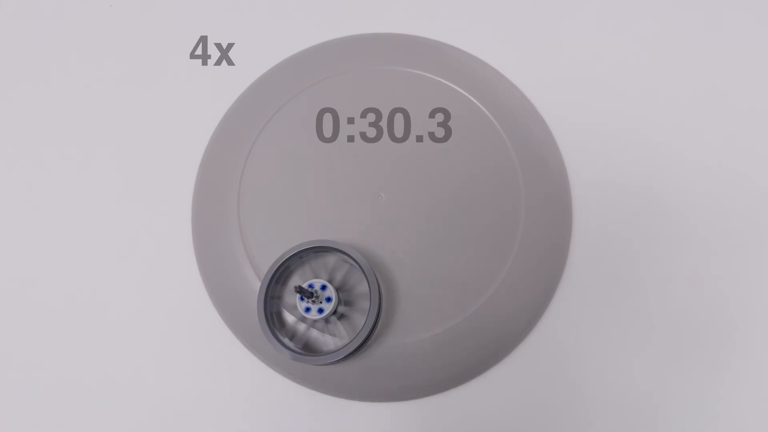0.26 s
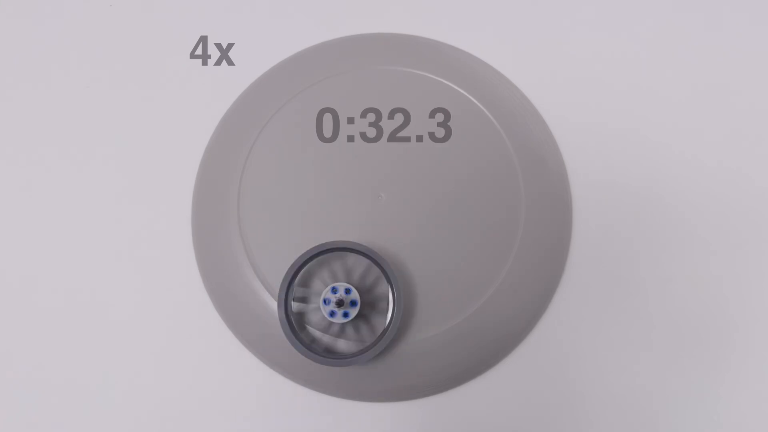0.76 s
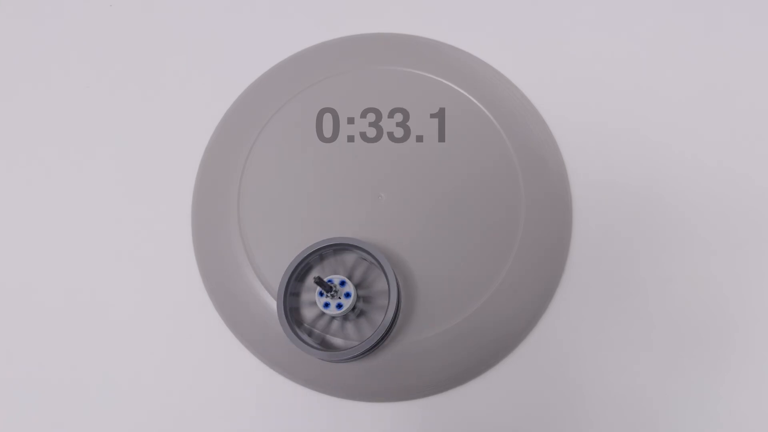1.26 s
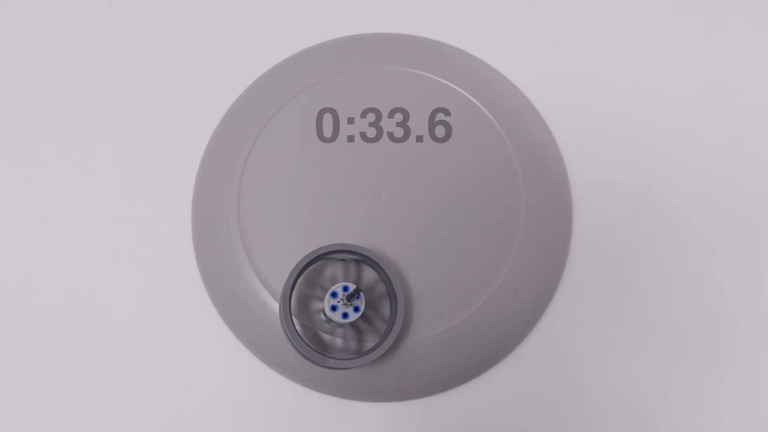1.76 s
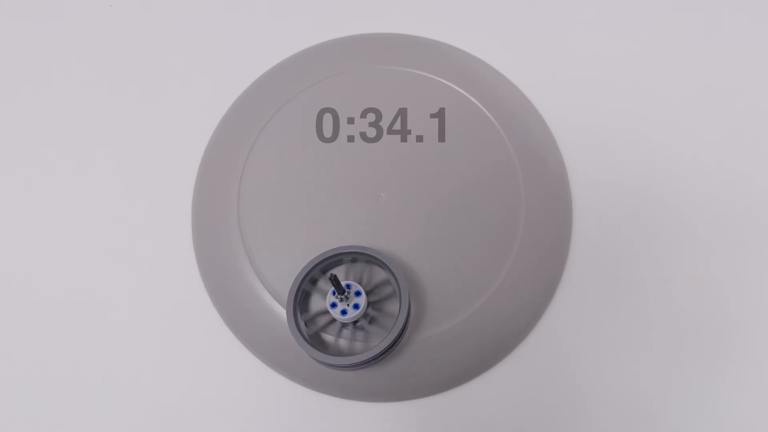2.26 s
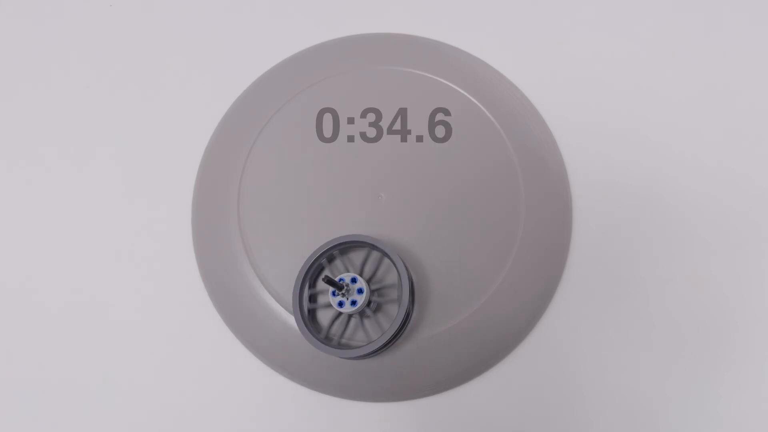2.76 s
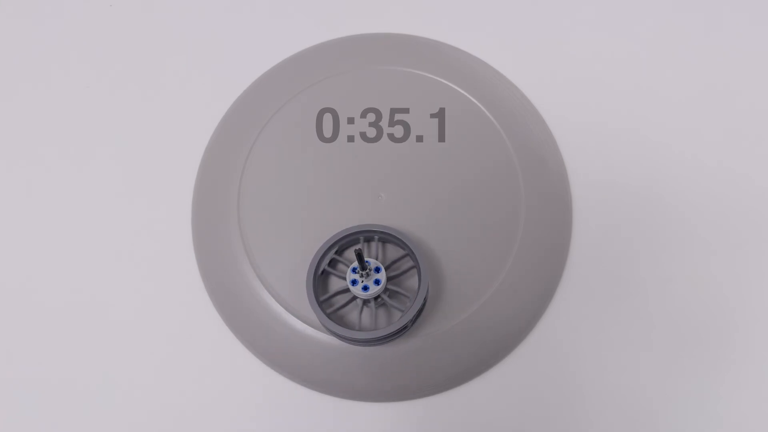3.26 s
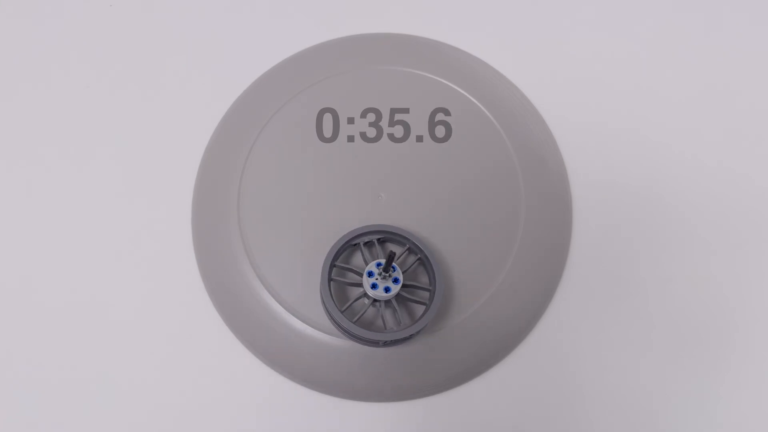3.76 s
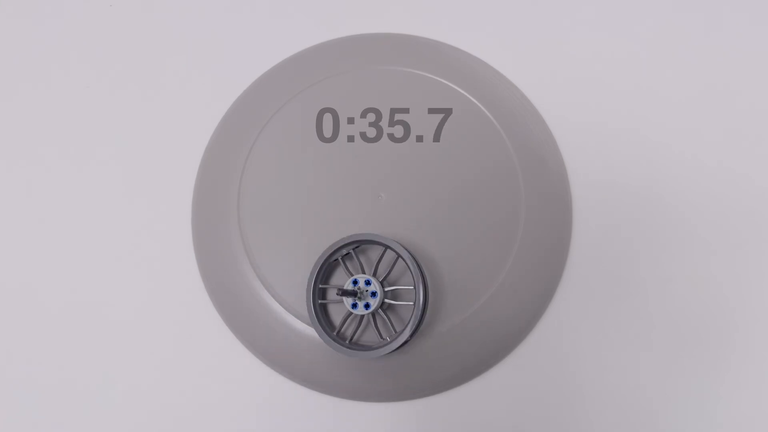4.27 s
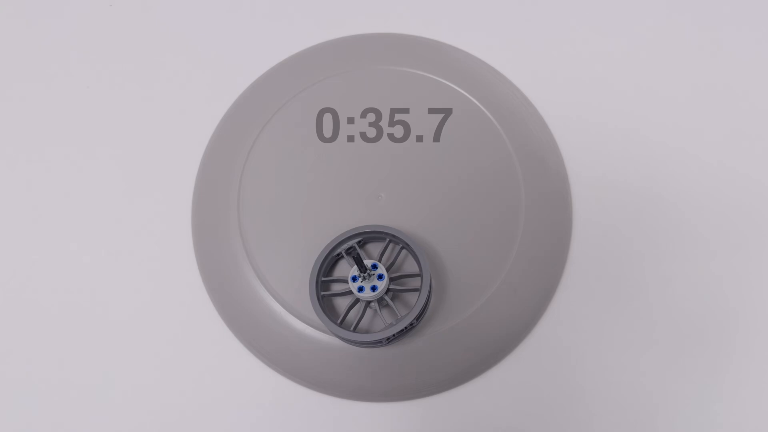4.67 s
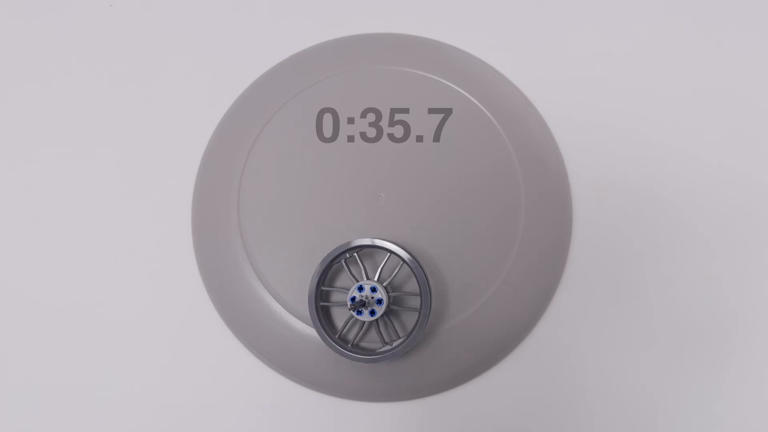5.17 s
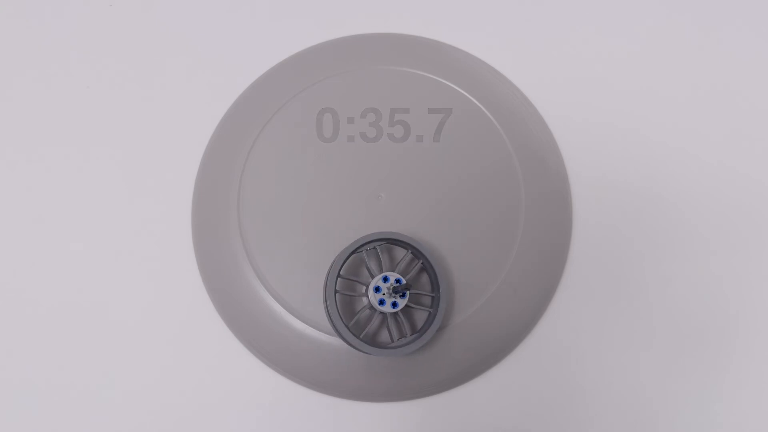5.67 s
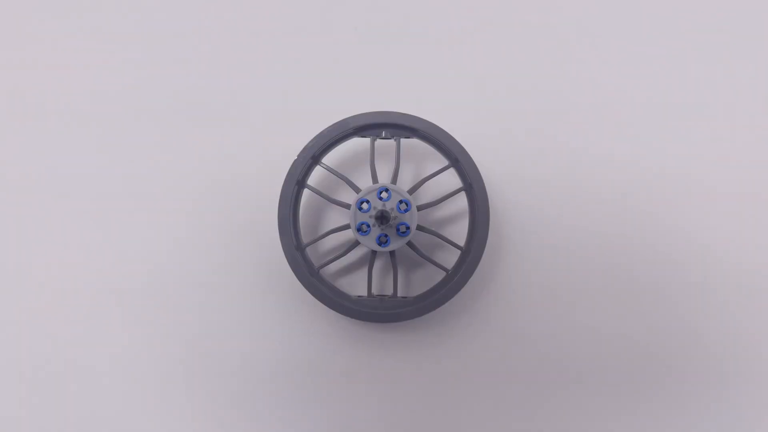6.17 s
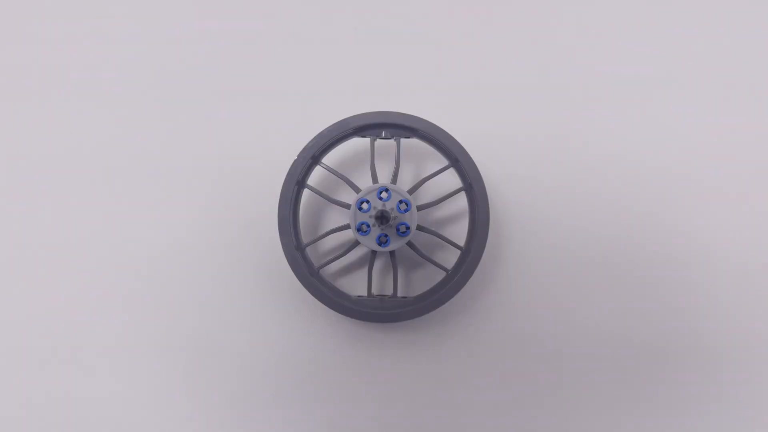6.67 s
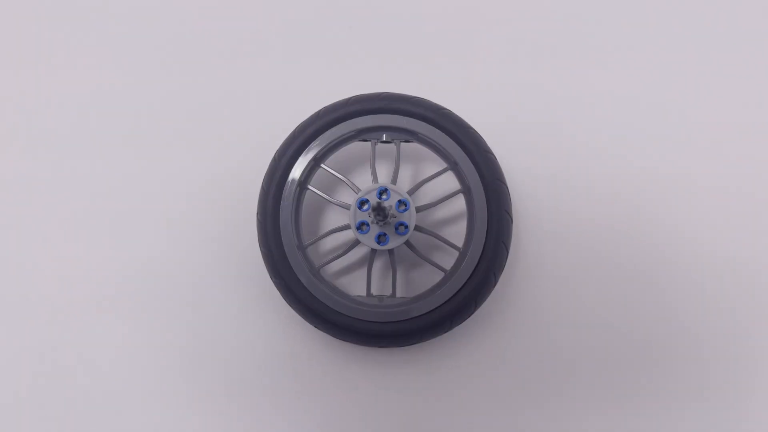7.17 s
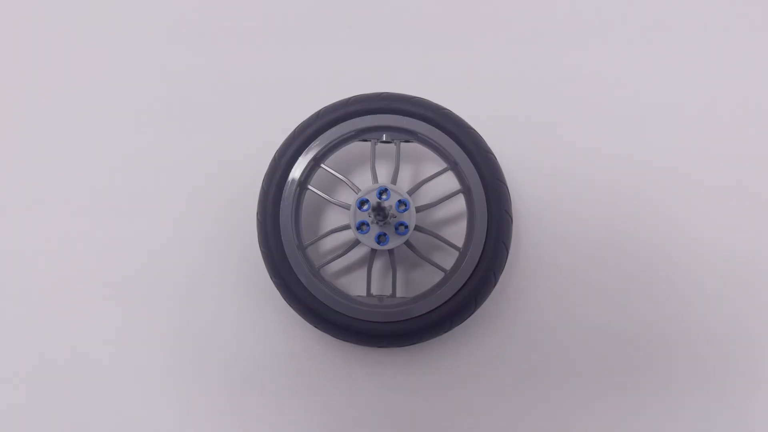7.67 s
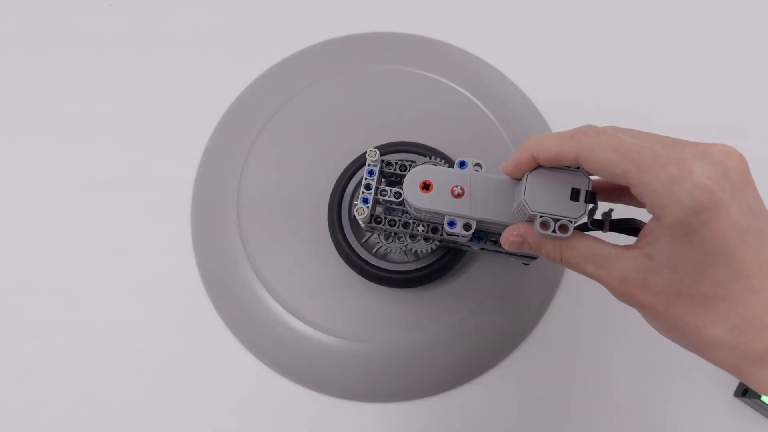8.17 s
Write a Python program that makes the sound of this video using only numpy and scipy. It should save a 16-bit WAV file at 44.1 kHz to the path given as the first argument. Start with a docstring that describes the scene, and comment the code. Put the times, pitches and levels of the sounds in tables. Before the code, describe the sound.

Over a low hum, a spinning plastic wheel tips, rattles and rocks to rest in a dish, followed by one finger-like snap.

```python
"""A low, uneven hum: a plastic wheel spun as a top turns on its tip in an upturned plastic dish.
It tilts; its rim strikes, skips and scrapes round the dish for two seconds, ringing dish and wheel.
It rolls to and fro with a few hollow knocks and rests. A sharp snap, as of fingers, follows in the
quiet room: a crack plus the ring of a small air pocket."""
import sys
import numpy as np
from scipy import signal
from scipy.fft import rfft, irfft, next_fast_len
from scipy.io import wavfile
from scipy.ndimage import uniform_filter1d, minimum_filter1d, map_coordinates

SR = 44100
rng = np.random.default_rng(int(sys.argv[2]) if len(sys.argv) > 2 else 0)


def dump(signal):
    """Clip the signal to [-1, 1] and save it as 16-bit WAV at the path in sys.argv[1]."""
    limited = np.clip(np.atleast_2d(signal).T, -1, 1)
    pcm = np.round(limited * 32767).astype(np.int16)
    wavfile.write(sys.argv[1], SR, pcm)


N = 371763

# dish modes: f/Hz, width/Hz, level/dB
DISH_MODES = [(151, 23, -8.5), (171, 17, -8.5), (208, 45, -8), (275, 33.5, -6), (349, 66, -8),
              (432.6, 25.6, -4.5), (521.6, 30, 3), (595, 44, -4.5), (727, 68, -8.5), (955.5, 24, -5.5),
              (1051, 70, -4.5), (1141, 30, -1.5), (1152, 22, 0), (1306, 158, -9), (1519, 113, -9.5),
              (2002, 370, -15.5), (2250, 294, -14), (2757, 330, -17.5), (2944, 230, -17.5),
              (3463, 100, -24), (4062, 380, -22.5), (4884, 390, -29.5)]
# wheel modes: f/Hz, width/Hz, level/dB, swing phase/spoke gaps, swing/dB
WHEEL_MODES = [(5600, 450, -13.5, 0.24, 1.5), (6506, 95, -0.5, 0.03, 8.5), (6980, 160, -3.5, 0, 3.5),
               (7690, 170, -5, 0.5, 3), (8240, 180, -4, 0.4, 0.5), (9090, 180, -7.5, 0.97, 2),
               (9720, 240, -10, 0.43, 7), (11400, 350, -18.5, 0, 0), (12650, 500, -23.5, .6, -1),
               (14100, 470, -15, .55, 2.5)]
# rim slides: start/s, end/s, pressure/dB
RIM_SLIDES = [(1.476, 1.525, 3.5), (1.615, 1.646, -1.5), (1.674, 1.688, 0), (1.702, 3.82, 0.5)]
# contact speed round the rim: t/s, speed/(spokes/s)
RIM_SPEED = [(1.45, 6.25), (2.15, 6.2), (2.5, 5.1), (2.95, 4.9), (3.25, 3.15), (3.55, 2.0), (3.82, 0.35)]
# rim strikes dish: t/s, level/dB, hardness/Hz, bounce delay/s
RIM_KNOCKS = [(.860, -26.5, 1420, 0.0015), (.865, -23, 690, 0.0023), (1.4589, -2, 1210, 0.014),
              (1.470, -5.5, 1200, .021), (1.503, -21, 3000, 0.0065), (1.511, -33, 2800, 0.0016),
              (1.535, -23.5, 4050, 0.0025), (1.539, -16, 4000, 0.0026), (1.551, -11, 2130, .003),
              (1.596, -13.5, 2366, .001), (1.609, -19.5, 2000, .006), (1.639, -12, 2500, 0.0025),
              (1.645, -12, 2500, 0.0017), (1.672, -9, 1970, .007), (1.693, -10.5, 1500, .005),
              (1.698, -10, 2300, .007), (1.875, -21.5, 4200, .004), (1.900, -21.5, 2620, 0.0016),
              (2.023, -13, 3500, 0.0028), (2.6281, -11, 2190, 0.015), (2.656, -10.5, 1030, 0.0019),
              (2.666, -10, 1100, 0.0065), (3.403, -19, 1900, .004), (3.885, -25.5, 990, 0.018),
              (3.9647, -3.5, 840, .0079), (4.058, -21, 695, 0.0027), (4.097, -21.5, 644, 0.0032),
              (4.304, -7, 790, .0055), (4.416, -41.5, 4000, 0.0025), (4.904, -31.5, 750, 0.0035),
              (4.942, -45.5, 4500, 0.0022), (5.056, -8, 646, .002), (5.267, -26, 600, 0.0025),
              (5.404, -25.5, 560, 0.0027), (5.6549, -9, 694, .0057)]
# rolls on the rim: peak t/s, level/dB, rise/s, fall/s
ROLL_SWELLS = [(3.72, -44.5, .12, .15), (3.95, -32, 0.24, 0.098), (4.14, -24.5, 0.09, 0.04),
               (4.45, -37.5, 0.14, .05), (5.0, -36, 0.14, 0.11), (5.32, -27.5, 0.11, 0.094),
               (5.72, -46, 0.045, 0.066), (5.82, -37.5, 0.056, 0.067)]
# tip hum envelope: t/s, level/dB
TIP_LEVELS = [(0, -45), (.85, -49), (.9, -43), (4.45, -42), (4.7, -43), (4.92, -40.5), (5.2, -43),
              (5.85, -43), (5.89, -55)]
# tip hum spectrum: f/Hz, level/dB
TIP_SPECTRUM = [(29, -59), (50, -34), (116, -3.5), (158, 5), (211, -5.5), (313, -4.5), (391, -15),
                (514, -12), (859, -20), (1130, -15.5), (1700, -27), (2020, -31.5), (3000, -44),
                (3900, -60.5), (6600, -120)]
# snap pulses: t/s, thump/dB, crack/dB
SNAP_PULSES = [(6.8699, 6, -2), (6.8943, -15.5, -21.5)]
# snap crack spectrum: f/Hz, level/dB
CRACK_SPECTRUM = [(100, -16.5), (450, -11), (1000, -2), (2100, 7.5), (3200, -4.5), (4100, 3), (5000, -12),
                  (5900, 2), (6800, -5.5), (8600, 0), (10500, -17), (16000, -11.5)]
# room decay: f/Hz, t60/s
ROOM_DECAY = [(150, 0.4), (1200, 0.33), (3000, 0.18), (12000, 0.055)]
# background envelopes: t/s, air/dB, hiss/dB
BACKGROUND_LEVELS = [(0, -59, -65), (.87, -50, -69), (.9, -48.5, -63), (5.86, -52.5, -61.5),
                     (5.9, -54.5, -71.5), (7.1, -53.5, -72.5), (7.13, -54, -67), (7.86, -52, -59),
                     (7.89, -58.5, -97.5), (8.43, -59, -95)]
# room air spectrum: f/Hz, level/dB
AIR_SPECTRUM = [(15, -59.5), (25, -40), (59, -17), (75, -21), (158, -2.5), (191, -12.5), (257, -8),
                (394, -18.5), (501, -15), (637, -22.5), (691, -18), (978, -23.5), (1090, -17), (1860, -34),
                (15000, -51.5)]
# hiss spectrum: f/Hz, level/dB
HISS_SPECTRUM = [(500, -1), (2000, 8), (3300, -1.5), (4100, 3), (5000, -3.5), (8000, -3), (16000, -7.5)]


def scrape(fast_hop_share=0.89, slow_hop_share=0.35, lift_power=8.2):
    """The rim chatters over the dish, louder and brighter with speed. Fast, it hops; slow, it rubs."""
    speed, spokes = travel()
    press = pressure()
    lift = speed ** lift_power  # a fast rim is mostly airborne: less boom, more ring
    hop_share = slow_hop_share + (fast_hop_share - slow_hop_share) * speed ** 2
    force = asperities(rate_hz=3500, spread_db=3, smooth=0.51)
    force = force * (1 - hop_share + hop_share * hops()) * flights(lift)
    boom, rasp = scraped_dish(force, spokes)
    ring = scraped_wheel(force, spokes)

    def layer(x, db, db_per_doubling):
        return x / x[press > 0].std() * amp(db + db_per_doubling * np.log2(speed))

    return press * (layer(boom, -24.5 - 2.5 * lift, 5) + layer(rasp, -34, 8.5)
                    + layer(ring, -36 + 4 * lift, 9))


def scraped_dish(force, spokes, node_db=1.77, split_hz=1600):
    """Low boom and high rasp. The contact crosses each mode's nodes; high modes have more."""
    boom, rasp = np.zeros((2, N))
    for k, (hz, width_hz, db) in enumerate(DISH_MODES):
        shape = np.cos(2 * np.pi * (spokes * np.sqrt(hz / 800) + rng.random()))
        drive = force * amp(db + node_db * min(hz / 900, 1.5) * shape)
        band = rasp if hz > split_hz else boom
        band += (-1) ** k * resonate(drive, hz, width_hz)
    boom = filtered(boom, lambda f: radiation(f) * (1 - highpass(f, 4000)))
    rasp = filtered(rasp, lambda f: highpass(f, 900))
    return boom, rim_comb(rasp, spokes, echo=0.32)


def scraped_wheel(force, spokes, flicker_db=5, flicker_hz=110):
    """Wheel modes swing with the contact's place between spokes and flicker at random."""
    ring = np.zeros(N)
    for k, (hz, width_hz, db, phase, swing_db) in enumerate(WHEEL_MODES):
        place_db = swing_db * np.cos(2 * np.pi * (spokes - phase))
        drive = force * amp(db + place_db + flicker_db * np.tanh(wobble(flicker_hz)))
        ring += (-1) ** k * resonate(drive, hz, width_hz)
    return rim_comb(filtered(ring, lambda f: highpass(f, 3800)), spokes, echo=0.35)


def travel(first_spoke_s=1.49):
    """Contact speed as a share of its maximum, and spokes passed."""
    spoke_hz = np.interp(np.arange(N) / SR, *np.transpose(RIM_SPEED))
    passed = np.cumsum(spoke_hz) / SR
    return spoke_hz / spoke_hz.max(), 1 + passed - passed[round(first_spoke_s * SR)]


def pressure(attack_s=0.0036, release_s=0.0038):
    """The rim bears on the dish during each slide."""
    t = np.arange(N) / SR
    return sum(amp(db) * np.clip(np.minimum((t - start) / attack_s, (end - t) / release_s) + 1, 0, 1)
               for start, end, db in RIM_SLIDES)


def asperities(rate_hz, spread_db, smooth):
    """Friction force: tiny uneven collisions over a smooth rub."""
    hits = (rng.random(N) < rate_hz / SR) * amp(spread_db * np.clip(rng.standard_normal(N), -2, 2))
    return unit(hits - hits.mean()) + smooth * rng.standard_normal(N)


def hops(rate_hz=210, scatter=0.3, spread_db=2, t60_s=0.011):
    """Uneven rim landings, each grinding briefly; rms 1."""
    gap, size = rng.standard_normal((int(2 * rate_hz * N / SR), 2)).T
    times_s = np.cumsum(np.exp(scatter * gap) / rate_hz)
    strengths = amp(spread_db * np.clip(size, -2, 2))
    landings = np.bincount(np.round(times_s * SR).astype(int), strengths, N)[:N]
    return unit(signal.lfilter([1], [1, -amp(-60 / (t60_s * SR))], landings))


def flights(lift, rate_hz=22, length_s=0.0074, depth_db=-14):
    """Gain dips where the fast rim leaves the dish."""
    takeoffs = rng.random(N) < lift * rate_hz / SR
    window = signal.windows.tukey(round(length_s * SR))
    airborne = signal.oaconvolve(takeoffs * 1.0, window)[:N]
    return amp(depth_db * np.clip(airborne, 0, 1))


def rim_comb(x, spokes, echo, near_s=0.0022, far_s=0.0038):
    """Waves run both ways round the rim; their path difference drifts with the contact."""
    lag_s = near_s + (far_s - near_s) * (0.5 - 0.5 * np.cos(np.pi * spokes))
    delayed = map_coordinates(x, [np.arange(N) - lag_s * SR], order=3)
    return (x + echo * delayed) / np.hypot(1, echo)


def knocks(buzz=0.11, buzz_t60_s=0.034, bounce_loss_db=9.5, tick_db_per_octave=9.5):
    """Each blow and its bounce ring dish and wheel, with a dry crack and a buzz of loose parts."""
    out, t = np.zeros(N), np.arange(SR // 4) / SR
    body = minimum_phase(pressed_dish)
    for start_s, db, hard_hz, bounce_s in RIM_KNOCKS:
        knock = unit_peak(contact(body, hard_hz))
        tick_db = -19.5 + tick_db_per_octave * np.log2(hard_hz / 1000)  # harder rings the wheel more
        for delay_s, loss_db in [(0, 0), (bounce_s, bounce_loss_db)]:
            rattle = (t == 0) + buzz * rng.standard_normal(len(t)) * amp(-60 * t / buzz_t60_s)
            ring = sum((-1) ** k * amp(mode_db) * resonate(rattle, hz, width_hz)
                       for k, (hz, width_hz, mode_db, _, _) in enumerate(WHEEL_MODES))
            crack = amp(-13) * resonate(rattle, hz=5000, width_hz=4000)
            tick = amp(tick_db) * unit_peak(ring + crack)
            add(out, start_s + delay_s, amp(db - loss_db) * (knock + tick))
    return out


def roll(soft_hz=260, hard_hz=800, gain_db=-3, edge_drop_db=23):
    """Rolling without slip presses softly on the dish: one swell per rock, brighter when stronger."""
    t, swells = np.arange(N) / SR, np.zeros(N)
    for peak_s, db, rise_s, fall_s in ROLL_SWELLS:
        from_peak = np.clip(np.maximum((peak_s - t) / rise_s, (t - peak_s) / fall_s), 0, 4)
        swells += amp(db - edge_drop_db * from_peak ** 2)
    force = asperities(rate_hz=650, spread_db=2, smooth=0.5)
    rumble = signal.oaconvolve(force, minimum_phase(pressed_dish))[:N]
    soft, hard = unit(contact(rumble, soft_hz)), unit(contact(rumble, hard_hz))
    firmness = swells / swells.max()
    return amp(gain_db) * swells * ((1 - firmness) * soft + firmness * hard)


def pressed_dish(f):
    """Response of the dish when pressed, not scraped: low, hollow boom."""
    modes = sum((-1) ** k * amp(db) * mode(f, hz, width_hz)
                for k, (hz, width_hz, db) in enumerate(DISH_MODES))
    boost = 1 + amp(1) * mode(f, hz=335, width_hz=60)
    dip = 1 - 0.57 * mode(f, hz=780, width_hz=300)
    return radiation(f) * modes * boost * dip


def radiation(f, low_hz=112):
    """The dish is too small to radiate deep bass."""
    return f ** 4 / np.sqrt(f ** 8 + low_hz ** 8)


def contact(x, hard_hz):
    """A softer contact lasts longer and loses treble."""
    pole = np.exp(-2 * np.pi * hard_hz / SR)
    return signal.lfilter([(1 - pole) ** 2], [1, -2 * pole, pole ** 2], x)


def snap(pocket_hz=1200, upper_hz=1520, ring_t60_s=0.014, crack_t60_s=0.01, attack_s=0.0007, low_hz=220):
    """A crack and the brief ring of an air pocket too small to give bass."""
    out, t = np.zeros(N), np.arange(SR // 10) / SR
    for start_s, thump_db, crack_db in SNAP_PULSES:
        pocket = np.sin(2 * np.pi * pocket_hz * t) + amp(-11) * np.sin(2 * np.pi * upper_hz * t)
        thump = pocket * amp(-60 * t / ring_t60_s) * (1 - np.exp(-t / attack_s))
        crack = noise(CRACK_SPECTRUM, len(t)) * amp(-60 * t / crack_t60_s)
        add(out, start_s, amp(thump_db) * unit_peak(thump) + amp(crack_db) * unit_peak(crack))
    return signal.lfilter(*signal.butter(1, low_hz, "high", fs=SR), out)


def tip_hum(waver_db=1.3, waver_hz=24):
    """The tip turns on the dish: low, wavering noise."""
    return envelopes(TIP_LEVELS)[0] * unit(noise(TIP_SPECTRUM) * amp(waver_db * wobble(waver_hz)))


def room(x, delay_s=0.004):
    """Small-room tail, shorter in the treble."""
    hz, t, spectra = signal.stft(rng.standard_normal(SR // 2), SR, nperseg=256)
    decay = amp(-60 * t / log_interp(ROOM_DECAY, hz)[:, None])
    tail = signal.istft(spectra * decay, SR, nperseg=256)[1]
    return signal.fftconvolve(x, np.pad(tail / np.linalg.norm(tail), (round(delay_s * SR), 0)))[:N]


def background():
    """Room air and faint hiss."""
    air, hiss = envelopes(BACKGROUND_LEVELS)
    return air * noise(AIR_SPECTRUM) + hiss * noise(HISS_SPECTRUM)


def amp(db):
    return 10 ** (np.asarray(db) / 20)


def unit(x):
    return x / np.sqrt(np.mean(x ** 2) + 1e-20)


def unit_peak(x):
    return x / np.abs(x).max()


def log_interp(points, hz):
    f, values = np.transpose(points)
    return np.interp(np.log(hz + 1), np.log(f + 1), values)


def envelopes(rows):
    """Per-sample gain for each dB column; silent outside the rows."""
    times_s, *columns = np.transpose(rows)
    t = np.arange(N) / SR
    grid_s = t[::64]
    return [np.interp(t, grid_s, amp(np.interp(grid_s, times_s, db, left=-150, right=-150)))
            for db in columns]


def wobble(rate_hz):
    """Random curve, linear between knots."""
    knots = rng.standard_normal(int(N * rate_hz / SR) + 2)
    return np.interp(np.arange(N) * rate_hz / SR, np.arange(len(knots)), knots)


def filtered(x, response):
    size = next_fast_len(len(x) + SR // 4)
    return irfft(rfft(x, size) * response(np.fft.rfftfreq(size, 1 / SR)), size)[:len(x)]


def noise(spectrum, size=N):
    """Coloured noise, rms 1."""
    return unit(filtered(rng.standard_normal(size), lambda f: amp(log_interp(spectrum, f))))


def add(track, start_s, x):
    part = track[round(start_s * SR):][:len(x)]
    part += x[:len(part)]


def mode(f, hz, width_hz):
    """Complex response of one resonance."""
    return 1j * f * width_hz / (hz * hz - f * f + 1j * f * width_hz)


def resonate(x, hz, width_hz):
    return signal.lfilter(*signal.iirpeak(hz, hz / width_hz, fs=SR), x)


def highpass(f, hz):
    return f ** 2 / (f ** 2 + hz ** 2)


def minimum_phase(response, size=SR // 4):
    """Most prompt impulse response with this magnitude."""
    magnitude = np.abs(response(np.fft.rfftfreq(2 * size, 1 / SR)))
    cepstrum = irfft(np.log(magnitude + 1e-6))
    cepstrum[1:size] *= 2
    cepstrum[size + 1:] = 0
    return irfft(np.exp(rfft(cepstrum)))[:size]


def scene():
    """Top and snap, both close, in a quiet room; mono."""
    top = scrape() + roll() + knocks()
    click = snap()
    reverb = amp(-18.5) * room(top) + amp(-21.5) * room(click)
    return (top + click + reverb + tip_hum() + background())[None]


def record(dry, ceiling=0.96, hold_s=0.0022, band_limit_hz=15950):
    """Fast peak limiter, then band limit."""
    span = round(hold_s * SR)
    needed = ceiling / np.maximum(np.abs(dry[0]), ceiling)
    gain = uniform_filter1d(minimum_filter1d(needed, span), span)
    return filtered(dry[0] * gain, lambda f: f < band_limit_hz)[None]


dry = scene()
out = record(dry)
dump(out)
```